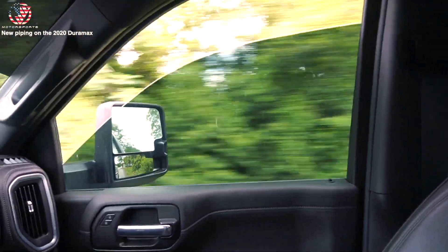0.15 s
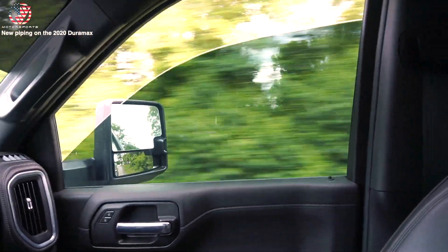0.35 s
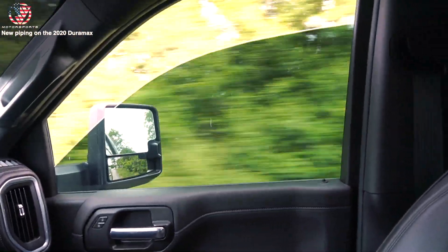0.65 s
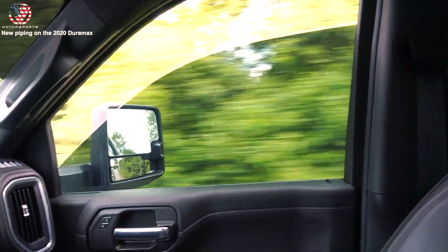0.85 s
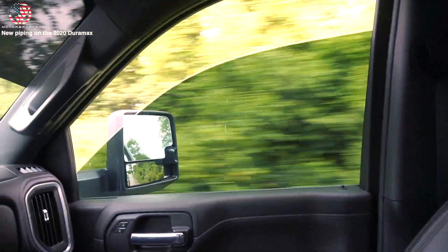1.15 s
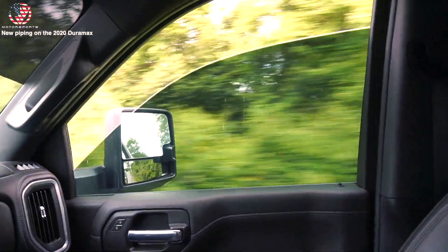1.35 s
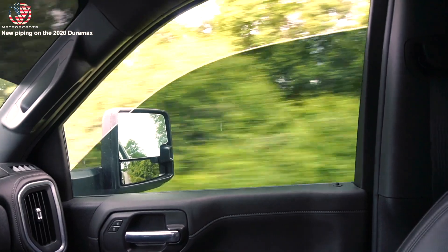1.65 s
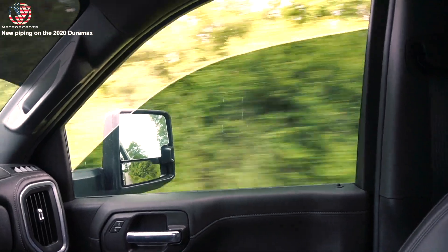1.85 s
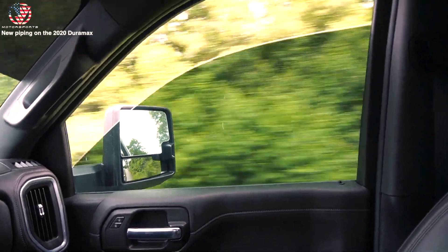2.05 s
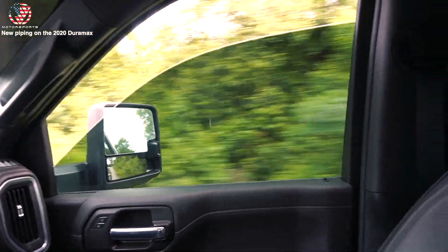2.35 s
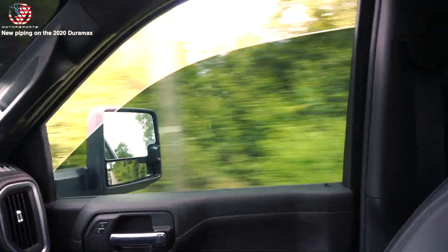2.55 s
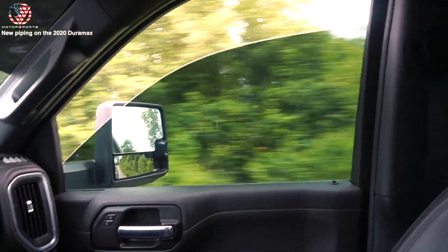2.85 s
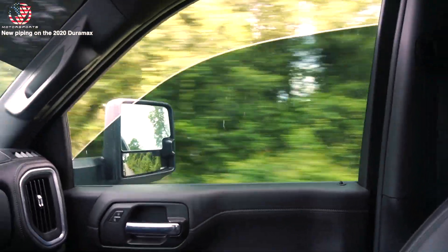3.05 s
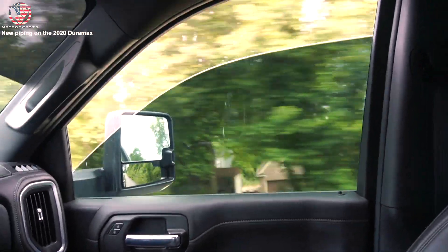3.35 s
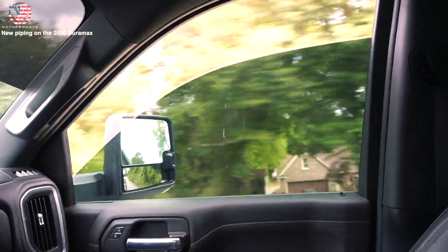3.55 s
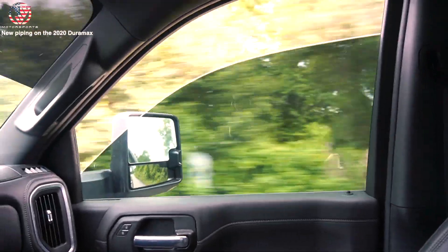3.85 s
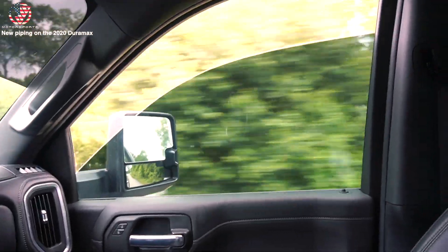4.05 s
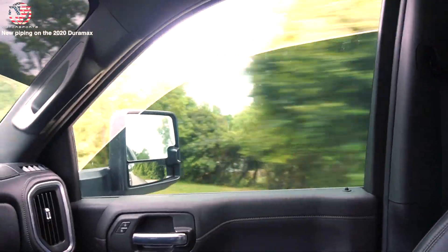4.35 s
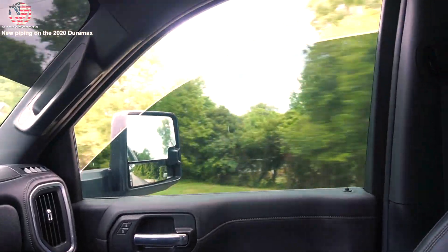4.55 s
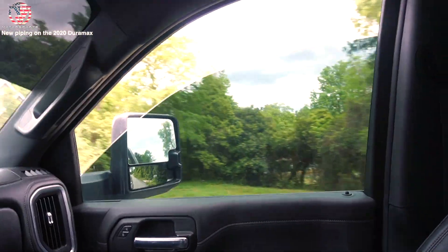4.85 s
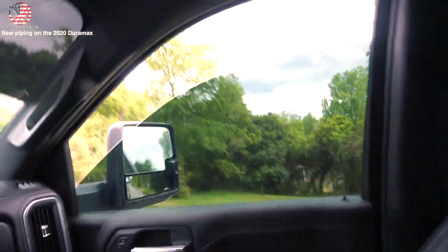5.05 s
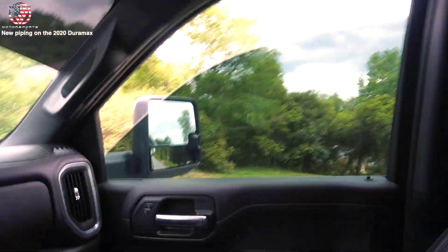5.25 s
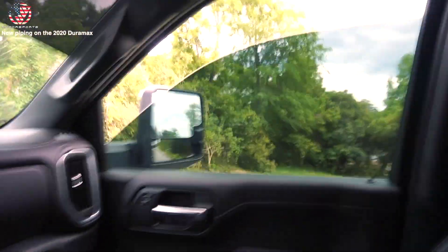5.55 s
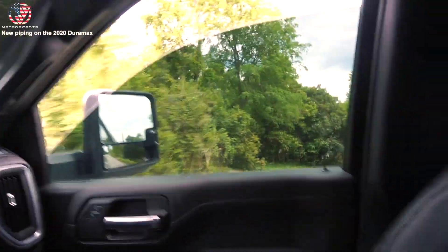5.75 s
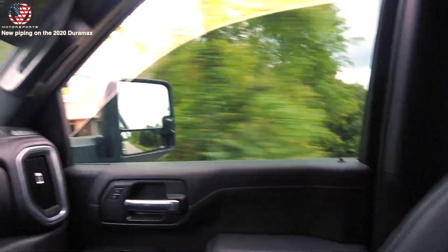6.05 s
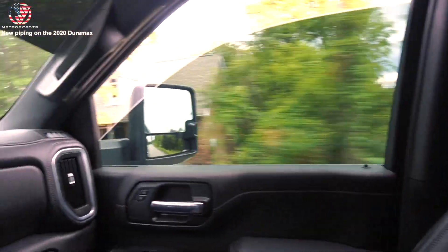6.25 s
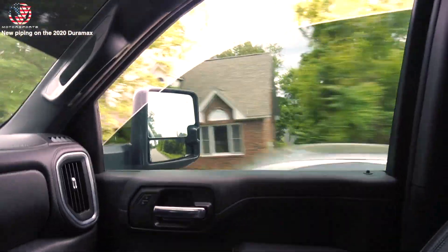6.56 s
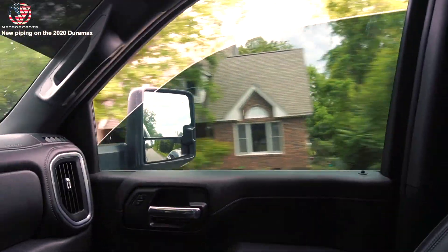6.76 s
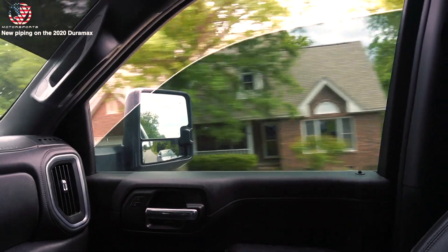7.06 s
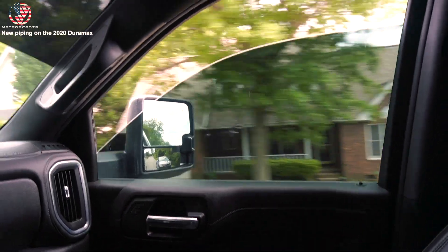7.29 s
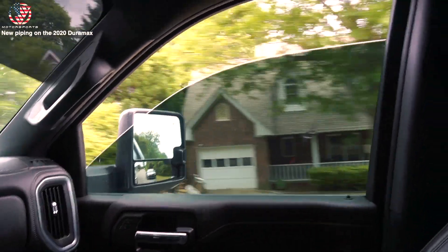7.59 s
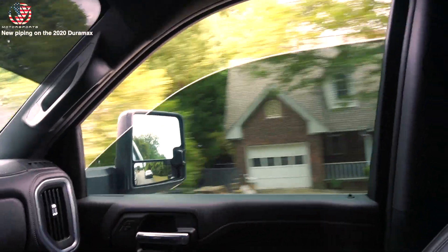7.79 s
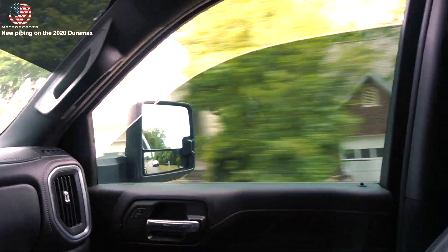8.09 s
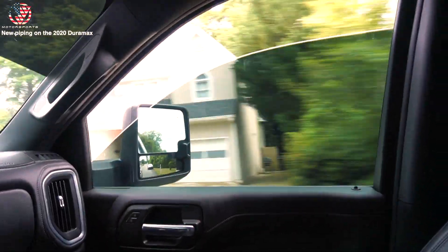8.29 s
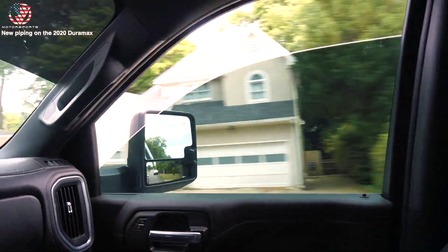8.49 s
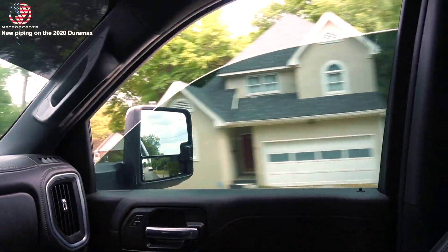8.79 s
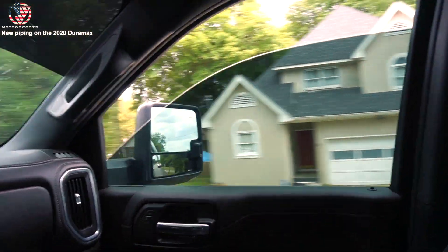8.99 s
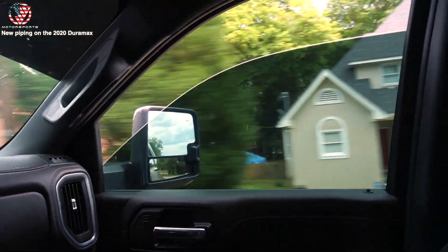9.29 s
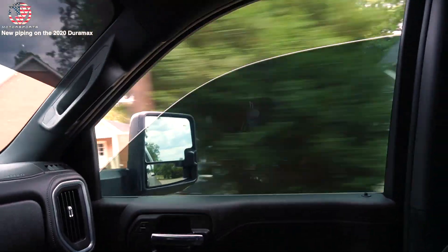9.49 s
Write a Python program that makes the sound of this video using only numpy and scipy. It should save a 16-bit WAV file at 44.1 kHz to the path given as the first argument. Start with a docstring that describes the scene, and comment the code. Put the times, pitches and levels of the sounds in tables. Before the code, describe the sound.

A stereo cab microphone catches a diesel truck easing off the throttle: the deep drone weakens and wavers while a hissy turbo note falls in pitch above broad tyre roar and boom. A rough patch jolts the cab with a deep heave, dull thumps, one hard knock and loose trim ticks. After a calmer stretch, air rushes in, the whistle rises, the engine surges briefly, and everything settles to a quieter coast.

```python
"""Diesel pickup on a suburban road

Inside a V8 diesel pickup driving along a suburban road, with a side window partly down.
The exhaust drones as a harmonic series of the engine cycle; the turbo sings as a gliding band of noise.
Coloured noise gives the intake's hiss and the tyres' roar and boom, and noisy tones give the tread's hum.
Halfway the truck jolts over a bump, heard as low swings, thumps, a knock and rattles, then rolls on more
quietly."""
import sys
import numpy as np
from scipy import signal
from scipy.fft import rfft, irfft, next_fast_len
from scipy.io import wavfile
from scipy.ndimage import uniform_filter1d

SR = 44100
rng = np.random.default_rng(int(sys.argv[2]) if len(sys.argv) > 2 else 0)


def transcribe(signal):
    """Save signal, clipped to [-1, 1], as a 16-bit WAV file at the path in sys.argv[1]."""
    frames = np.atleast_2d(signal).T
    limited = np.clip(frames, -1, 1)
    pcm = np.round(limited * 32767).astype(np.int16)
    wavfile.write(sys.argv[1], SR, pcm)


N = 424683  # samples


def from_db(db):
    """Logarithmic level: decibels become an amplitude gain."""
    return 10 ** (np.asarray(db) / 20)


def rms_one(x):
    """Normalisation: scale to unit rms."""
    return x / np.sqrt(np.mean(x ** 2) + 1e-20)


def in_time(rows):
    """Linear interpolation: each column of a time table, sample by sample."""
    start_s, *columns = np.transpose(rows)
    t = np.arange(N) / SR
    return [np.interp(t, start_s, column) for column in columns]


def at_hz(points, hz):
    """Spectral interpolation: read a spectrum on a log-frequency axis."""
    point_hz, value = np.transpose(points)
    return np.interp(np.log(np.maximum(hz, 1)), np.log(point_hz), value)


def drift(rate_hz):
    """Low-passed chance: a slow wander of spread 1, changing about rate_hz times a second."""
    step = 40  # samples between draws
    pole = np.exp(-2 * np.pi * rate_hz * step / SR)
    chance = rng.standard_normal(N // step + 2002)
    slow = signal.lfilter([1], [1, -2 * pole, pole * pole], chance)[2000:]  # the filter has settled
    return np.interp(np.arange(N) / step, np.arange(len(slow)), rms_one(slow))


def low_pass(x, hz):
    """First-order filtering: a gentle one-pole low-pass."""
    return signal.sosfilt(signal.butter(1, min(hz, .45 * SR), fs=SR, output="sos"), x)


def lift(modes, hz):
    """Resonance: decibels that a set of modes adds at a frequency."""
    return sum(db / (1 + (2 * (hz - centre_hz) / width_hz) ** 2) for centre_hz, width_hz, db in modes)


def pan(left_db):
    """Level difference between channels: two gains for a left-minus-right level."""
    return from_db(np.array([[.5], [-.5]]) * left_db)


# stereo image in the cab: pitch_hz [Hz], left-right likeness [1 = identical]
CAB_LIKENESS = [(30, 1), (130, 1), (280, 0.85), (600, 0.73), (1200, 0.71), (2500, 0.58), (5000, 0.3),
                (12000, 0.38)]


def spread(mid, side, hz):
    """Interchannel coherence: two unrelated sounds become left and right, alike in the bass, diffuse above."""
    alike = np.clip(at_hz(CAB_LIKENESS, hz), -1, 1)
    common = np.sqrt((1 + alike) / 2) * mid
    opposed = np.sqrt((1 - alike) / 2) * side
    return common + opposed * np.array([[1], [-1]])


def noise(spectrum, modes=()):
    """Spectral shaping: stereo noise of one colour, lifted at modes and falling beyond its ends; rms 1."""
    size = next_fast_len(N)
    hz = np.maximum(np.fft.rfftfreq(size, 1 / SR), 1)
    lowest_hz, highest_hz = spectrum[0][0], spectrum[-1][0]
    ends = np.minimum(1, np.minimum(hz / lowest_hz, highest_hz / hz)) ** 3
    colour_db = at_hz(spectrum, hz) + lift(modes, hz)
    white = rfft(rng.standard_normal((2, size)))
    mid, side = white * from_db(colour_db) * ends
    return rms_one(irfft(spread(mid, side, hz), size)[:, :N])


def resonance(hz, width_hz):
    """Modulated carrier: slow noise on a tone makes a stereo band that may move and widen; rms 1."""
    steps = 8 * np.cumsum(width_hz * np.ones(len(hz))) / SR  # a wider band sways faster
    b, a = signal.butter(2, 1 / 8)
    chance = signal.lfilter(b, a, rng.standard_normal((4, len(hz) // 2 + 50)))[:, 50:]
    sway = np.array([np.interp(steps, np.arange(len(c)), c) for c in chance])
    phase = 2 * np.pi * np.cumsum(hz) / SR
    mid, side = sway[:2] * np.cos(phase) + sway[2:] * np.sin(phase)
    return rms_one(spread(mid, side, np.mean(hz)))


def hum(hz, waver_db, wander_hz):
    """Amplitude and frequency modulation: a tone that wavers a little in level and pitch; rms 1."""
    phase = 2 * np.pi * np.cumsum(hz + wander_hz * drift(5.88)) / SR
    return rms_one(from_db(waver_db * drift(7.8)) * np.sin(phase))


def glide(start_s, end_s, start_hz, end_hz, edge):
    """Linear chirp: place, pitch and envelope of one slide; edge is the share spent fading in or out."""
    span = slice(round(start_s * SR), round(end_s * SR))
    progress = np.linspace(0, 1, span.stop - span.start)
    fade = np.clip(np.minimum(progress, 1 - progress) / edge, 0, 1)
    return span, start_hz + (end_hz - start_hz) * progress, np.sin(np.pi / 2 * fade)


def blows(rows, rise_s):
    """Exponential decay: envelope of soft blows that swell quickly and die away."""
    out, t = np.zeros(N), np.arange(SR) / SR
    for start_s, db, t60_s in rows:
        at = round(start_s * SR)
        swell = 1 - np.exp(-t / rise_s)
        out[at:at + SR] += 2 * swell * from_db(db - 60 * t / t60_s)
    return out


# firing tone before waver and gain: start_s [s], pitch_hz [firings per second], level_db [dB]
ENGINE_FIRING = [(0, 114, -15), (.33, 121.4, -12), (.93, 121.7, -13.5), (1.05, 121.8, -18),
                 (1.9, 122.6, -21.5), (2.13, 115, -20), (2.45, 102.5, -23.5), (3.1, 99, -19.5),
                 (4.2, 92.3, -17.5), (4.5, 88.9, -26.5), (4.75, 90.66, -17), (5.6, 92, -28.5),
                 (6.1, 91, -26), (6.6, 84, -39), (7.36, 96, -19), (7.47, 97.6, -8.5), (7.64, 91.7, -10),
                 (7.8, 87, -24.5), (8.5, 81, -32.5), (9.63, 75, -27.5)]
# exhaust orders beside the firing tone: multiple [of the four-stroke cycle rate], level_db [dB, relative]
EXHAUST_ORDERS = [(5, -25.5), (6, -19.5), (7, -25), (9, -19), (10, -17), (12, -17.5), (13, -18),
                  (14, -21.5), (15, -21), (16, -26.5), (24, -30)]


def exhaust(waver_db=2.5, lope_db=1.5, orders_follow=0.46, loud_db=-15, gain_db=-0.5, left_db=3.0):
    """Harmonic series: eight firings a cycle drone, steadiest under load; unequal cylinders add orders."""
    steady_db, loose_db = -16, -20  # steady above the first level, wavering fully below the second
    firing_hz, level_db = in_time(ENGINE_FIRING)
    uneven_hz = firing_hz * (1 + .003 * drift(12))
    cycle = 2 * np.pi * np.cumsum(uneven_hz) / SR / 8  # phase of the four-stroke cycle
    loose = np.clip((steady_db - level_db) / (steady_db - loose_db), 0, 1)
    out = from_db(level_db + gain_db + waver_db * loose * drift(13)) * np.sin(8 * cycle)
    # below loud_db the orders fall less than the drone
    load_db = loud_db + orders_follow * np.minimum(level_db - loud_db, 0)
    for multiple, db in EXHAUST_ORDERS:
        order = np.sin(multiple * cycle + rng.uniform(0, 2 * np.pi))
        out += from_db(load_db + db + lope_db * drift(2.8)) * order
    return np.sqrt(2) * out * pan(left_db)


# compressor whistle before gain, flutter and duct: start_s [s], pitch_hz [Hz], level_db [dB]
TURBO_WHISTLE = [(0, 17100, -39), (.76, 14560, -39.5), (1.23, 10850, -38), (1.8, 8300, -41.5),
                 (2.3, 8540, -43.5), (2.85, 8130, -43), (3.7, 6900, -42.5), (4.35, 6310, -43.5),
                 (4.95, 6580, -52), (5.1, 6800, -67), (5.35, 7400, -57), (5.6, 7800, -70),
                 (5.85, 8550, -59), (6.1, 8600, -50), (6.37, 8700, -61), (6.5, 8880, -41),
                 (7.0, 10850, -39.5), (7.27, 12100, -32.5), (7.43, 12850, -38), (7.5, 12670, -51),
                 (7.82, 11140, -50), (8.05, 9450, -39), (8.4, 7640, -46), (8.85, 6206, -47.5),
                 (9.1, 5810, -58), (9.63, 5290, -54.5)]
# duct resonance that lifts the whistle sweeping through it: pitch_hz [Hz], width_hz [Hz], lift_db [dB]
TURBO_DUCT = [(6190, 150, 8)]


def turbo(core_share=.7, skirt_share=2.2, skirt_db=-8, flutter_db=0.7, octave_db=-28, gain_db=1.75,
          clean_db=-3, clean_width_hz=320):
    """Blade-passing tone: turbulence smears it into a breathy band; smooth flow lets a thin note through."""
    hz, level_db = in_time(TURBO_WHISTLE)
    sweep_hz_per_s = uniform_filter1d(np.abs(np.gradient(hz)) * SR, size=SR // 5)
    # 640 Hz wide at 8400 Hz, wider as a power of pitch, plus the pitch swept in 0.075 s
    width_hz = 640 * (hz / 8400) ** 2.2 + .075 * sweep_hz_per_s
    core = resonance(hz, core_share * width_hz)
    skirt = resonance(hz, skirt_share * width_hz)
    band = rms_one(core + from_db(skirt_db) * skirt)
    clean = from_db(clean_db) * np.minimum(clean_width_hz / width_hz, 1) ** 2  # thin note fades in wide bands
    tone = (band + clean * resonance(hz, 70)) / np.sqrt(1 + clean ** 2)
    octave = from_db(octave_db) * resonance(np.minimum(2 * hz, .45 * SR), 2 * width_hz)  # second blade harmonic
    whistle_db = level_db + lift(TURBO_DUCT, hz) + gain_db + flutter_db * drift(27)
    return from_db(whistle_db) * (tone + octave)


# rush of air before gain and flutter: start_s [s], level_db [dB]
INTAKE_LEVEL = [(0, -37), (.8, -42), (1.8, -48), (1.92, -43.5), (3.1, -47), (4.25, -46.5), (4.42, -43.5),
                (4.92, -48), (5.06, -52.5), (5.4, -48), (5.68, -56), (6.1, -48), (6.25, -50), (6.72, -37.5),
                (7.05, -39.5), (7.41, -36.5), (7.52, -44), (8.05, -48.5), (9.0, -61.5), (9.63, -56)]
# colour of the rush: pitch_hz [Hz], density_db [dB per Hz, relative]
INTAKE_SPECTRUM = [(550, -15), (1200, -8), (1800, -1), (2600, -3.5), (3100, -0.5), (4200, -1.5), (5600, 1),
                   (7000, 1), (9000, -0.5), (12000, -5.5), (16000, -13)]
# intake pipe resonances: pitch_hz [Hz], width_hz [Hz], lift_db [dB]
PIPE_MODES = [(695, 74, 16), (1112, 110, 19), (1280, 70, 8), (1970, 250, 1.5), (3200, 270, 1),
              (3640, 130, 3), (4800, 410, 1.5), (5580, 350, 0.5)]


def intake(gain_db=6.0, flutter_db=0.4, surge_db=1.0, dull_hz=6000, soft_db=-54, hard_db=-41,
           thin_from_hz=12500, thin_full_hz=16000, thin_share=0.41, body_hz=3500):
    """Turbulent pipe flow: air rushes in, brighter when drawn harder and thinner at top turbo speed."""
    level_db, = in_time(INTAKE_LEVEL)
    turbo_hz, _ = in_time(TURBO_WHISTLE)
    rush = noise(INTAKE_SPECTRUM, PIPE_MODES)
    load = np.clip((level_db - soft_db) / (hard_db - soft_db), 0, 1)
    thin = thin_share * np.clip((turbo_hz - thin_from_hz) / (thin_full_hz - thin_from_hz), 0, 1)
    air = load * rush + (1 - load) * low_pass(rush, dull_hz)
    air = air - thin * low_pass(rush, body_hz)
    return from_db(level_db + gain_db + flutter_db * drift(43) + surge_db * drift(7.5)) * air


# bands of air noise, some narrow and whining, some broad and breathy: start_s [s], end_s [s],
# start_hz [Hz], end_hz [Hz], width_hz [Hz], level_db [dB, before the swell]
AIR_BANDS = [(0, 0.652, 1130, 1142, 28.4, -39.5), (0, 0.621, 690, 712, 22.4, -38),
             (4.327, 4.946, 4260, 4210, 1100, -48), (5.549, 6.403, 2914, 2870, 170, -59),
             (6.659, 6.877, 4180, 3450, 600, -39), (6.809, 6.888, 3420, 3170, 170, -41),
             (6.702, 7.149, 2142, 2063, 500, -45), (7.123, 7.597, 424.4, 413, 15.1, -37.5),
             (7.546, 8.25, 2510, 2287, 1100, -46.5), (8.655, 8.69, 5290, 5400, 200, -55),
             (8.729, 8.78, 5400, 5550, 240, -53)]


def air_bands():
    """Band-limited noise: bands of air, some narrow and whining, some broad and breathy, swell, slide and fade."""
    out = np.zeros((2, N))
    for start_s, end_s, start_hz, end_hz, width_hz, db in AIR_BANDS:
        span, hz, swell = glide(start_s, end_s, start_hz, end_hz, edge=.3)
        out[:, span] += from_db(db) * swell * resonance(hz, width_hz)
    return out


# road sounds before gains: start_s [s], roar_db [dB], hum_db [dB], rumble_db [dB]
ROAD_LEVELS = [(0, -28.5, -33.5, -28.5), (1.2, -29.5, -27.5, -25.5), (3.3, -27.5, -26.5, -25.5),
               (4.3, -29, -27, -27), (4.9, -27.5, -29, -21), (5.1, -32.5, -45, -24),
               (5.38, -31, -43.5, -16.5), (5.7, -40.5, -43, -30), (6.15, -38.5, -45, -27.5),
               (6.45, -34.5, -40.5, -30.5), (7.5, -32, -30, -35), (8.3, -32.5, -34.5, -33),
               (9.2, -32, -34.5, -33), (9.63, -31.5, -32, -29)]
# colours of tyre roar, tyre boom and body rumble: pitch_hz [Hz], density_db [dB per Hz, relative]
ROAR_SPECTRUM = [(230, -1), (290, -3), (466, -4), (620, -4), (800, -6.5), (990, -11), (1170, -14),
                 (1400, -16.5), (2200, -23.5), (3000, -27.5), (4500, -33.5), (9000, -48), (16000, -66)]
BOOM_SPECTRUM = [(50, -27), (85, -2), (115, 4), (140, -8.5), (170, 0), (215, -1.5), (250, -12), (320, -24)]
RUMBLE_SPECTRUM = [(12, -21), (20, -4.5), (34, 1.5), (55, -12), (80, -4.5), (120, -24), (200, -51)]
# cab panels rung by the tyres: pitch_hz [Hz], width_hz [Hz], lift_db [dB]
PANEL_MODES = [(336.5, 30, 4.5), (418, 24, 2), (581, 18, 2.5), (693, 33, 6), (761, 18, 5), (801, 44, 6),
               (888, 26, 6), (1155, 37, 8.5), (1230, 37, 3.5), (1490, 62, 4.5), (2370, 120, 3),
               (2800, 230, 3.5)]


def road(roar_gain_db=0.25, texture_db=1.0, roar_left_db=-1.0, boom_db=5.0, boom_swell_db=1.0,
         boom_left_db=-2.1, rumble_left_db=-0.5):
    """Forced vibration: road texture roars through cab panels, tyres boom in step, the body rumbles below."""
    roar_db, _, rumble_db = in_time(ROAD_LEVELS)
    roar_gain = from_db(roar_gain_db + texture_db * drift(25))
    roar = noise(ROAR_SPECTRUM, PANEL_MODES) * roar_gain * pan(roar_left_db)
    boom_gain = from_db(boom_db + boom_swell_db * drift(2.6))
    boom = noise(BOOM_SPECTRUM) * boom_gain * pan(boom_left_db)
    rumble = noise(RUMBLE_SPECTRUM) * pan(rumble_left_db)
    return from_db(roar_db) * (roar + boom) + from_db(rumble_db) * rumble


# road speed, as the pitch of the tread: start_s [s], pitch_hz [Hz]
TREAD_PITCH = [(0, 209), (.9, 222), (1.7, 224), (2.8, 221), (3.5, 210), (4.3, 200), (4.9, 193), (6.4, 197),
               (7.5, 210), (8.2, 205.9), (9.0, 193.1), (9.63, 185.9)]
# tones of the tread: share [of its pitch], width_hz [Hz, of the noisy skirt], level_db [dB, relative]
TREAD_PARTIALS = [(1, 24, 2), (.858, 10, -2.5), (.815, 12, -7.5), (1.6, 14, -16)]
# air modes of the tyres and the cab: pitch_hz [Hz], width_hz [Hz], lift_db [dB]
TYRE_AND_CAB_MODES = [(192.1, 10.2, 10.5), (160.8, 14, 11)]


def tyre_hum(clean_db=-2, skirt_db=-4, left_db=1.2):
    """Cavity resonance: tread tones in noisy skirts follow road speed and swell passing the air modes."""
    tread_hz, = in_time(TREAD_PITCH)
    _, hum_db, _ = in_time(ROAD_LEVELS)
    out = np.zeros((2, N))
    for share, width_hz, db in TREAD_PARTIALS:
        hz = share * tread_hz
        tone_gain = from_db(clean_db + lift(TYRE_AND_CAB_MODES, hz))
        tone = tone_gain * hum(hz, waver_db=1.5, wander_hz=1.091)
        skirt = from_db(skirt_db) * resonance(hz, width_hz)
        out += from_db(db) * (tone + skirt)
    return from_db(hum_db) * out * pan(left_db)


# body shudders: start_s [s], end_s [s], start_hz [Hz], end_hz [Hz], level_db [dB, peak before panning]
BODY_SHUDDERS = [(2.382, 2.509, 39.8, 35.7, -14.5), (4.943, 5.099, 137.7, 114, -10.5),
                 (5.091, 5.203, 58.4, 49.5, -16), (5.118, 5.405, 31.2, 28.7, -17.5),
                 (5.398, 5.647, 35.2, 29, -8.5)]
# dull thumps of the tyres, suspension knocks and trim rattles, levels before the blow's envelope and
# panning or chatter: start_s [s], level_db [dB], t60_s [s]
TYRE_THUMPS = [(5.12, -16.5, 0.24), (5.31, -21.5, 0.47)]
SUSPENSION_KNOCKS = [(5.392, -10, 0.077)]
TRIM_RATTLES = [(4.971, -33, 0.14), (5.0, -29.5, 0.11), (5.098, -36, 0.17), (5.152, -27.5, 0.053),
                (5.48, -37.5, 0.12), (5.554, -36, 0.049), (5.6, -33.5, 0.056)]
# colours of knock and rattle: pitch_hz [Hz], density_db [dB per Hz, relative]
KNOCK_SPECTRUM = [(120, 16.5), (290, 15.5), (450, 4.5), (700, -2), (1050, -1), (1400, 1.5), (1800, -4.5),
                  (2300, -12), (3500, -15.5), (7000, -25), (15000, -38)]
RATTLE_SPECTRUM = [(200, 12.5), (700, 1), (1600, -0.5), (2700, -0.5), (3500, -3.5), (7000, -20),
                   (15000, -23)]


def bump(edge=0.13, left_db=6.5, thump_left_db=5.0):
    """Impulse response: uneven road thumps tyres, swings the cab, knocks the suspension, rattles trim."""
    swing = np.zeros(N)
    for start_s, end_s, start_hz, end_hz, db in BODY_SHUDDERS:
        span, hz, swell = glide(start_s, end_s, start_hz, end_hz, edge)
        swing[span] += from_db(db) * swell * np.sin(2 * np.pi * np.cumsum(hz) / SR)
    chatter = from_db(2.5 * drift(150))  # fast unsteadiness of knock and rattle
    knock = blows(SUSPENSION_KNOCKS, rise_s=0.0067) * noise(KNOCK_SPECTRUM)
    rattle = blows(TRIM_RATTLES, rise_s=0.0041) * noise(RATTLE_SPECTRUM)
    thump = blows(TYRE_THUMPS, rise_s=0.014) * noise(BOOM_SPECTRUM) * pan(thump_left_db)
    return swing * pan(left_db) + thump + chatter * (knock + rattle)


def scene():
    """Superposition: everything as heard from the front seats."""
    return exhaust() + turbo() + intake() + air_bands() + road() + tyre_hum() + bump()


def record(dry):
    """Saturation and band limiting: the highest peaks are rounded and the top is cut."""
    rounded = dry / (1 + (np.abs(dry) / .85) ** 6) ** (1 / 6)
    steep_cut = signal.ellip(12, .1, 90, 15900, fs=SR, output="sos")  # low-pass at 15900 Hz
    return signal.sosfilt(steep_cut, rounded)


dry = scene()
out = record(dry)
transcribe(out)
```